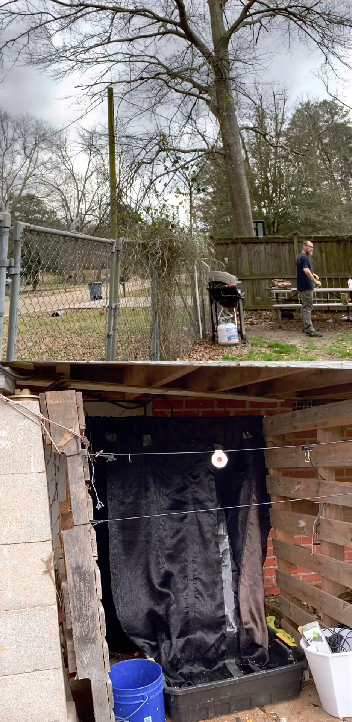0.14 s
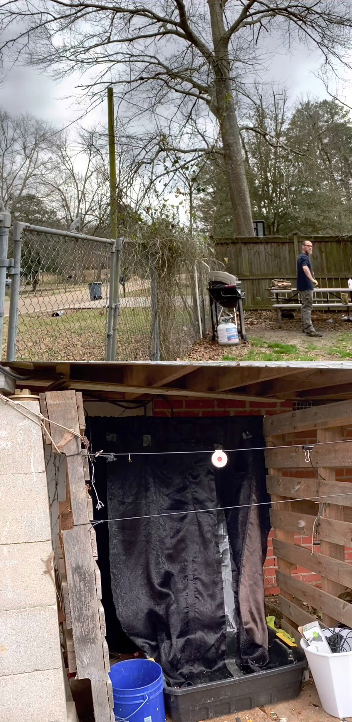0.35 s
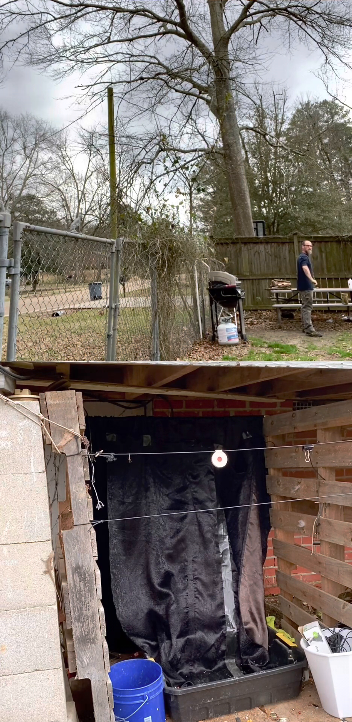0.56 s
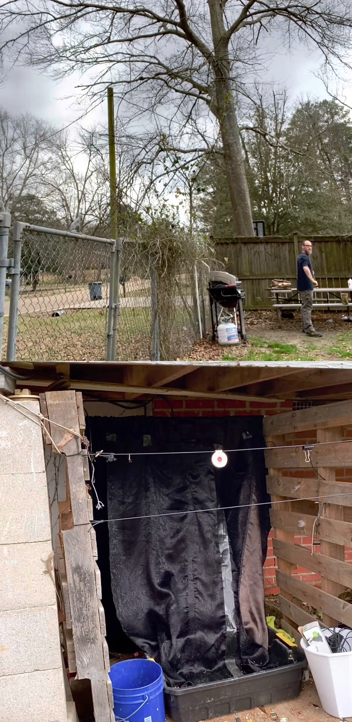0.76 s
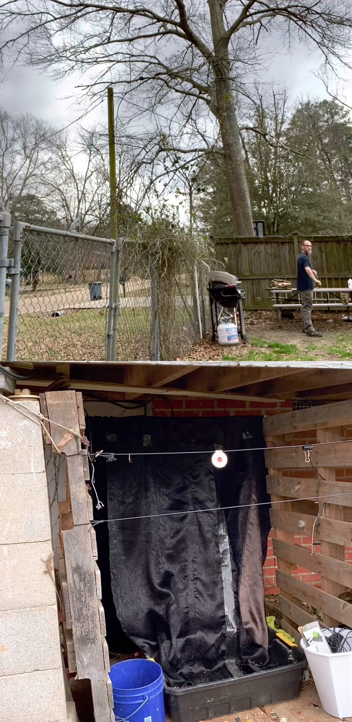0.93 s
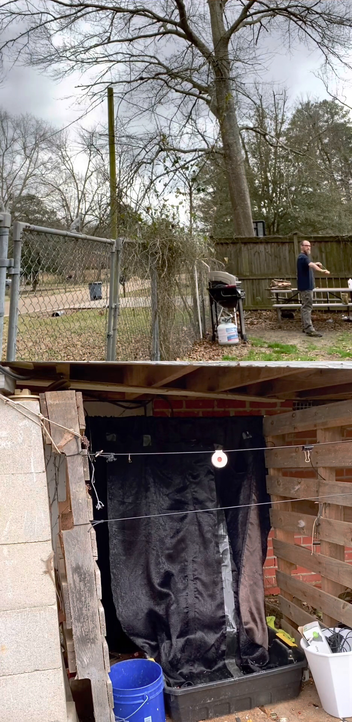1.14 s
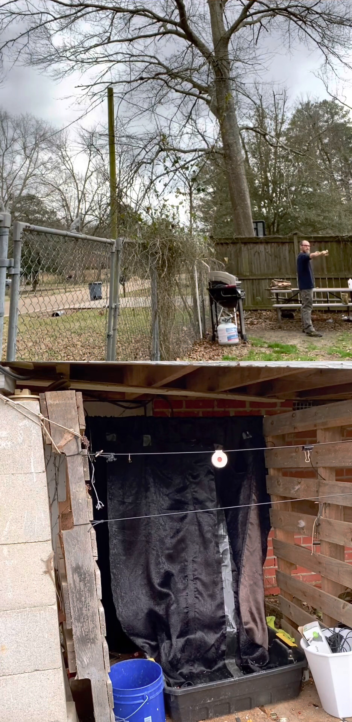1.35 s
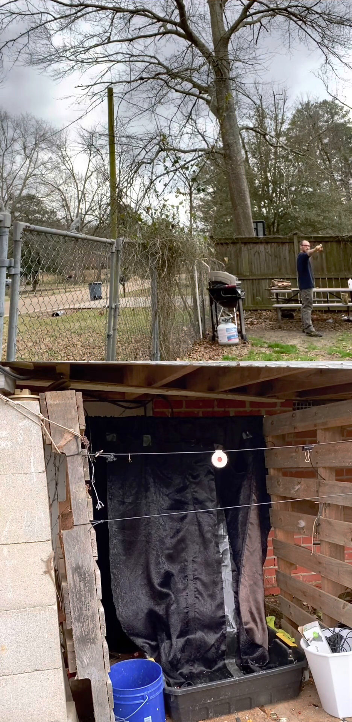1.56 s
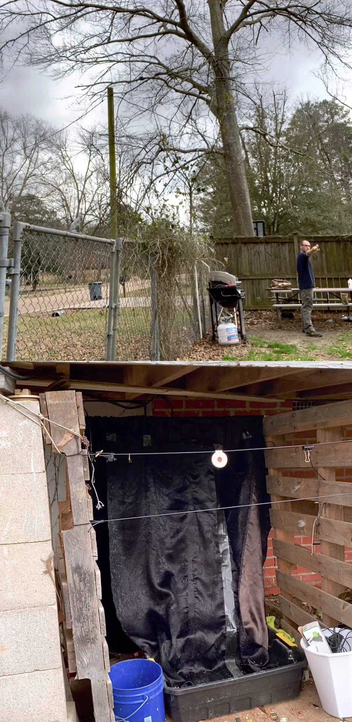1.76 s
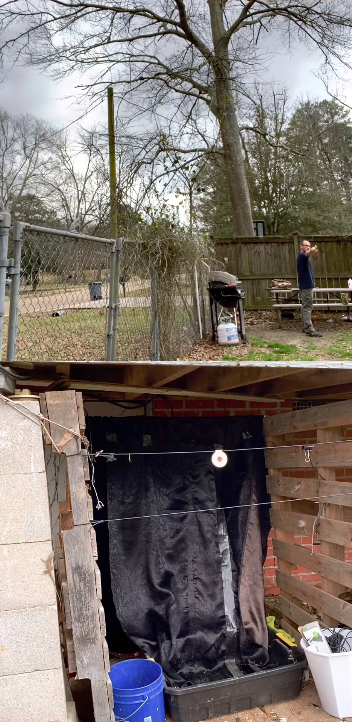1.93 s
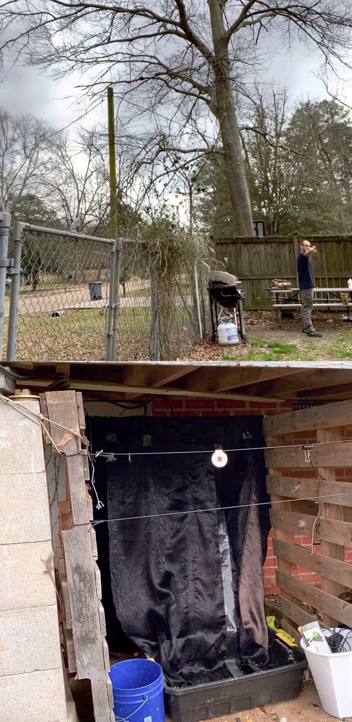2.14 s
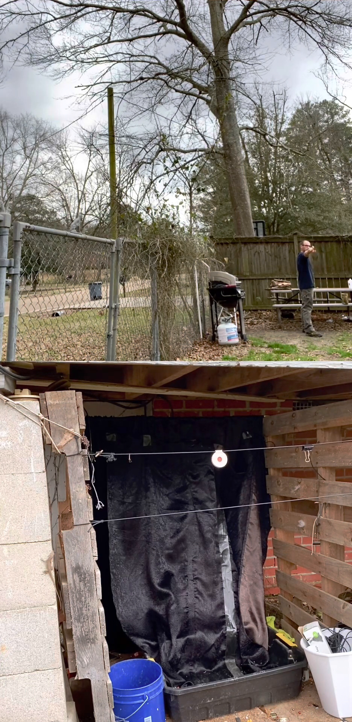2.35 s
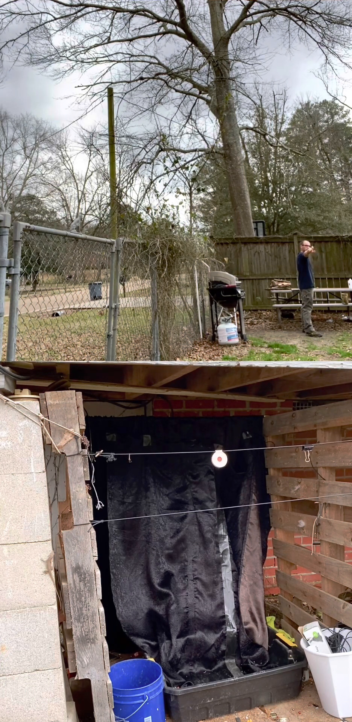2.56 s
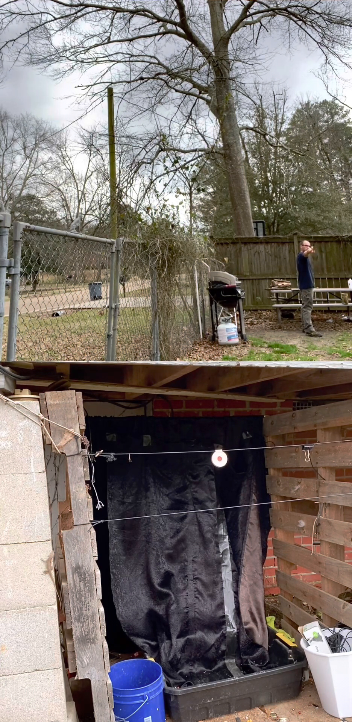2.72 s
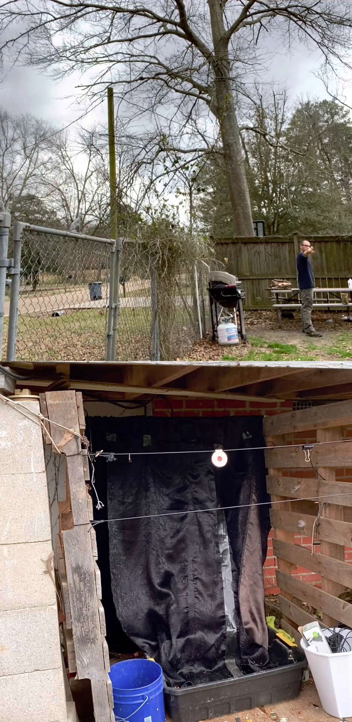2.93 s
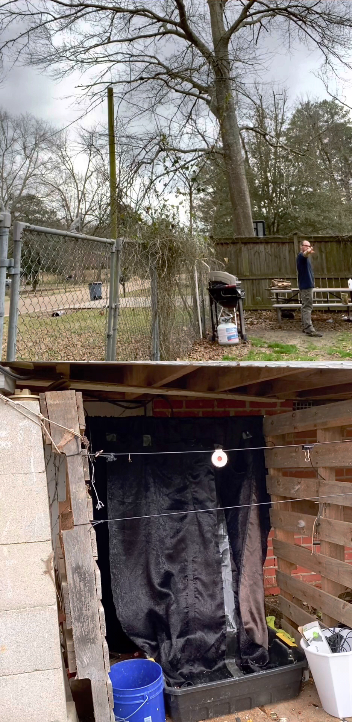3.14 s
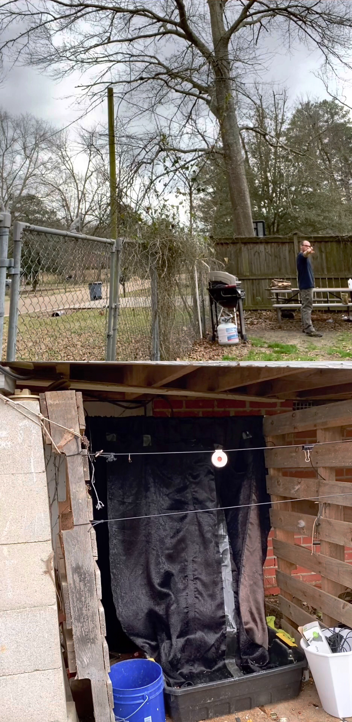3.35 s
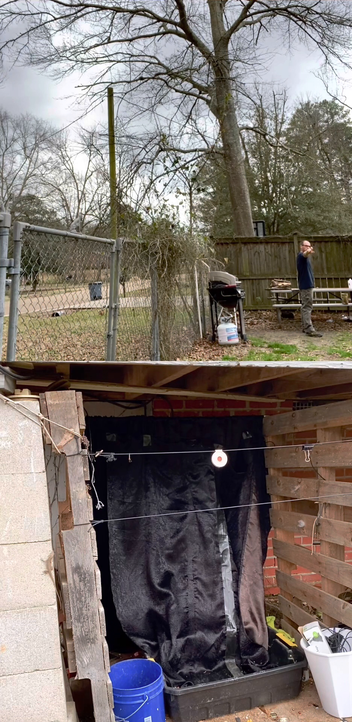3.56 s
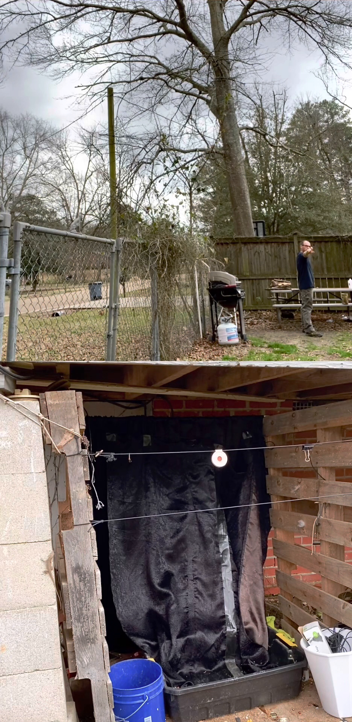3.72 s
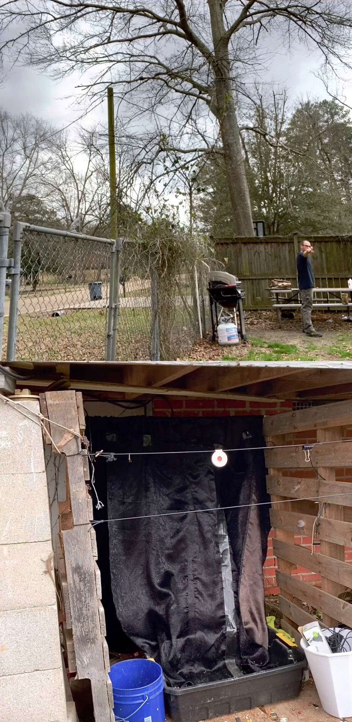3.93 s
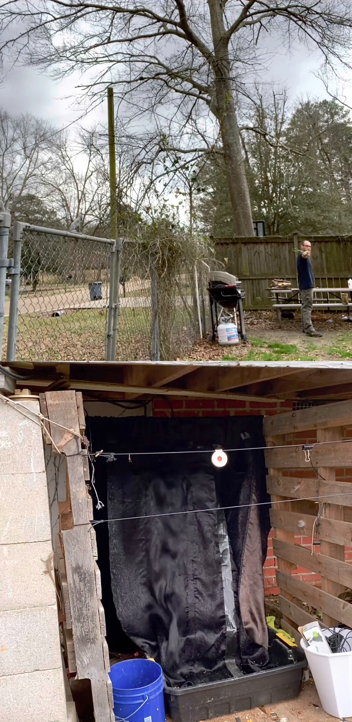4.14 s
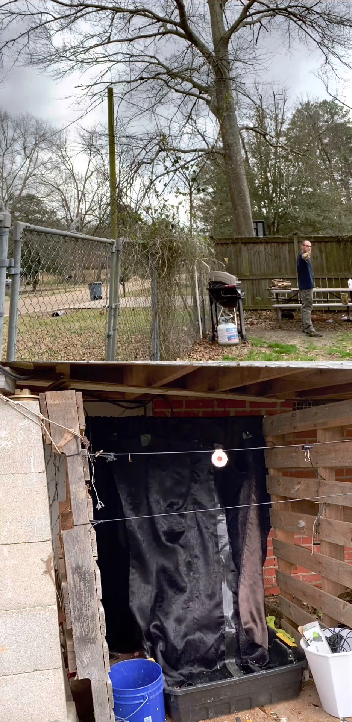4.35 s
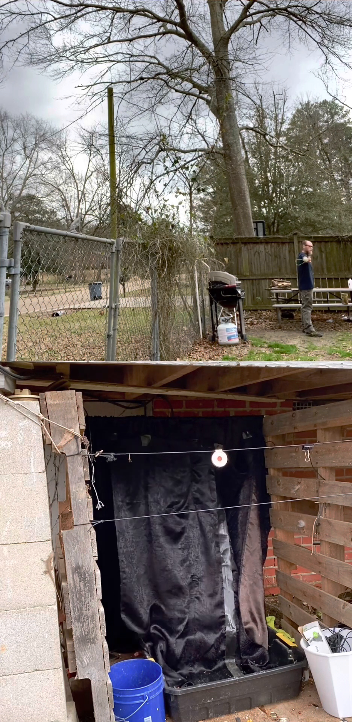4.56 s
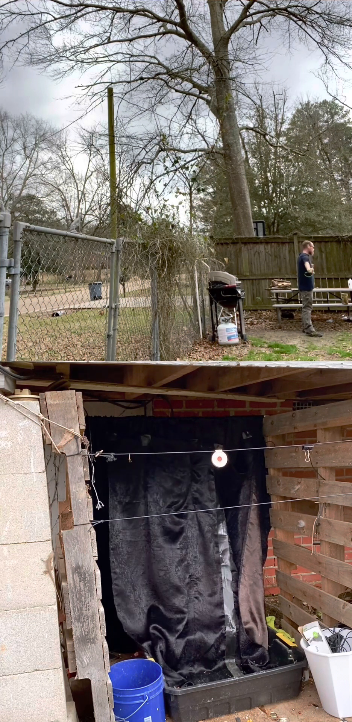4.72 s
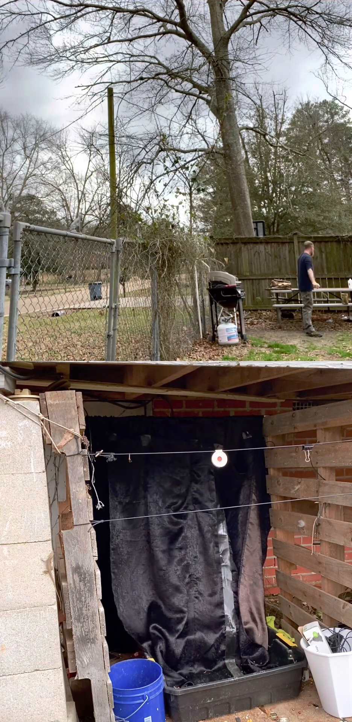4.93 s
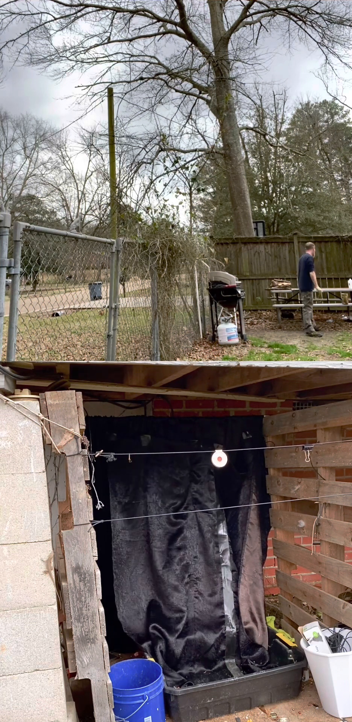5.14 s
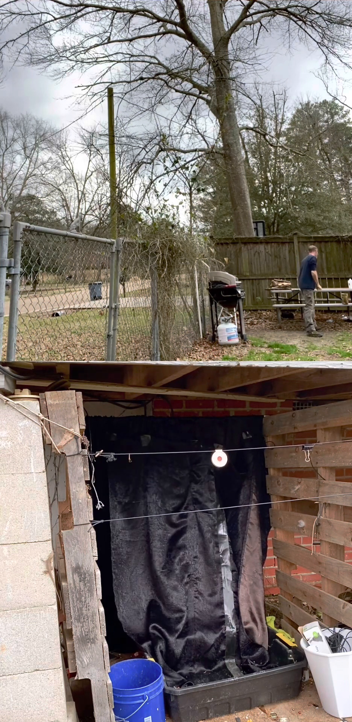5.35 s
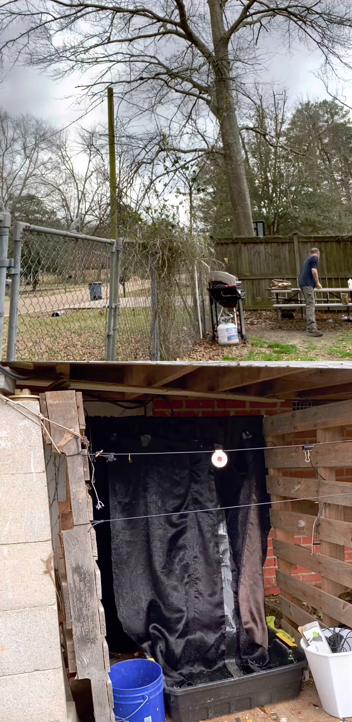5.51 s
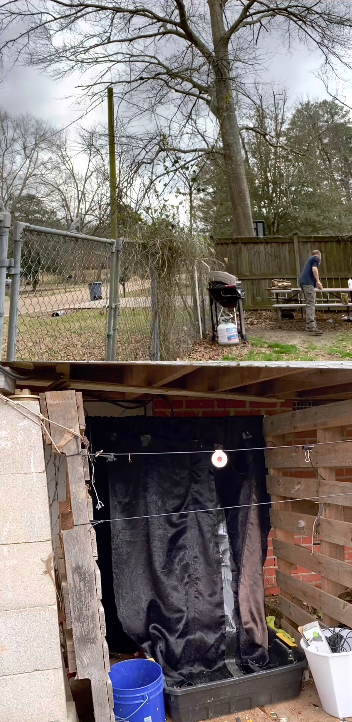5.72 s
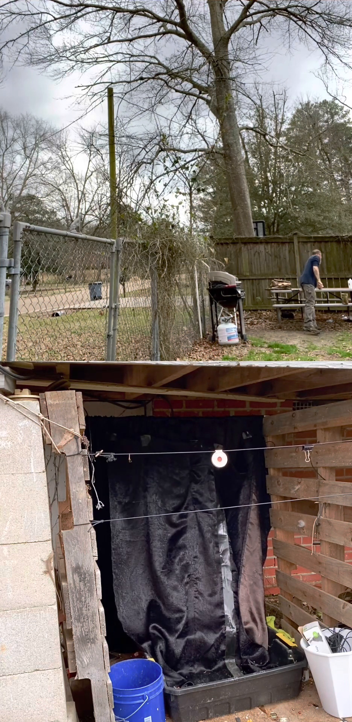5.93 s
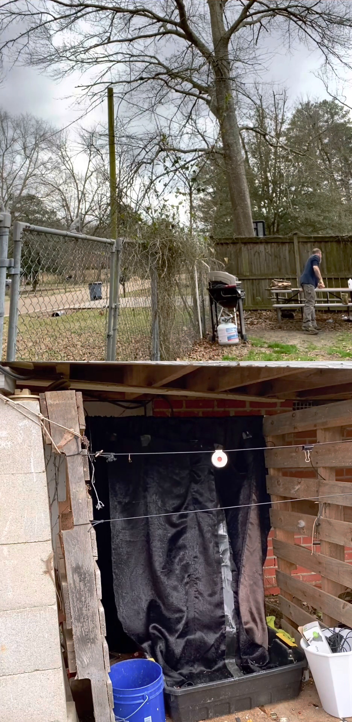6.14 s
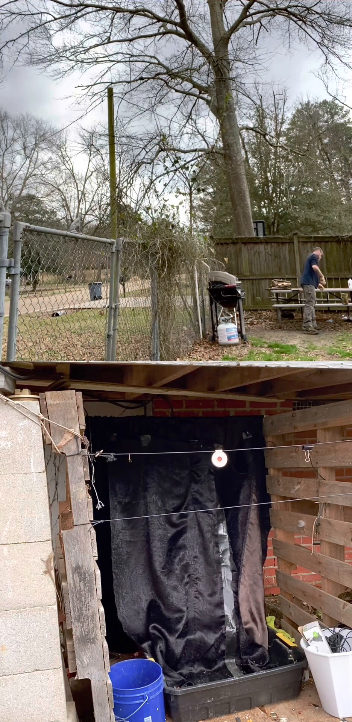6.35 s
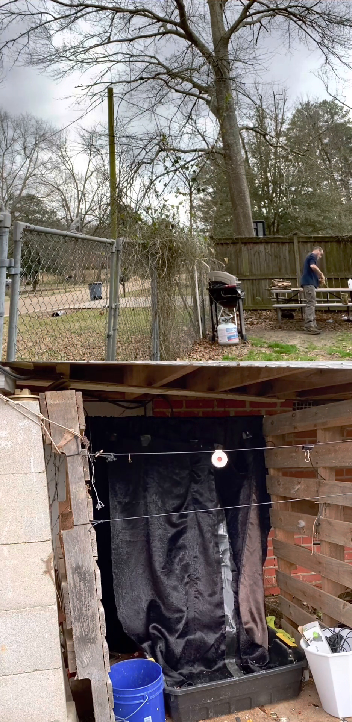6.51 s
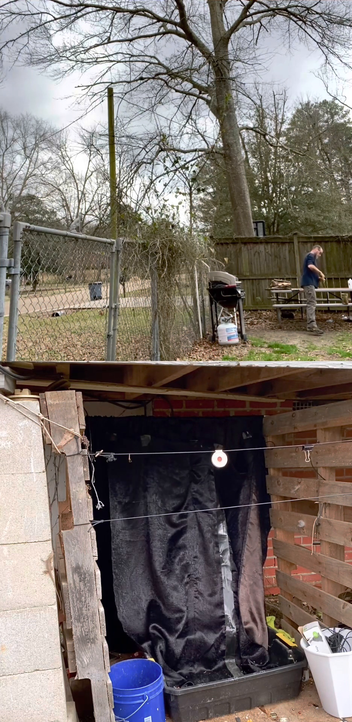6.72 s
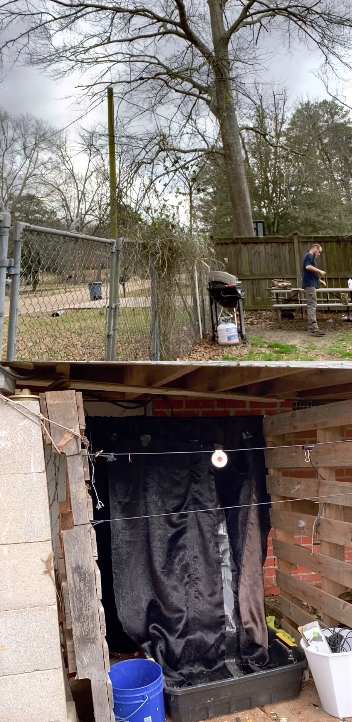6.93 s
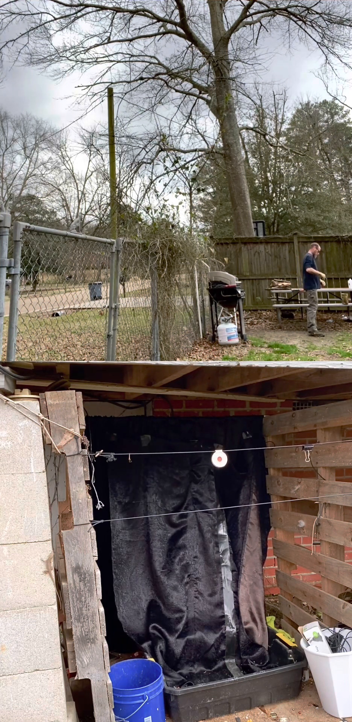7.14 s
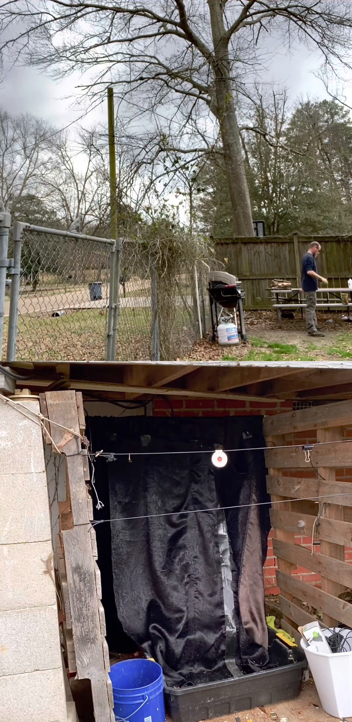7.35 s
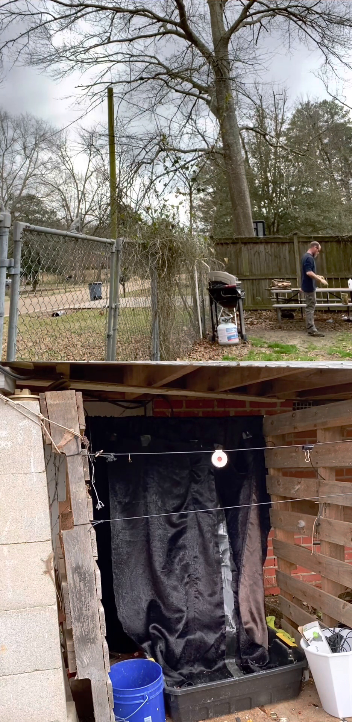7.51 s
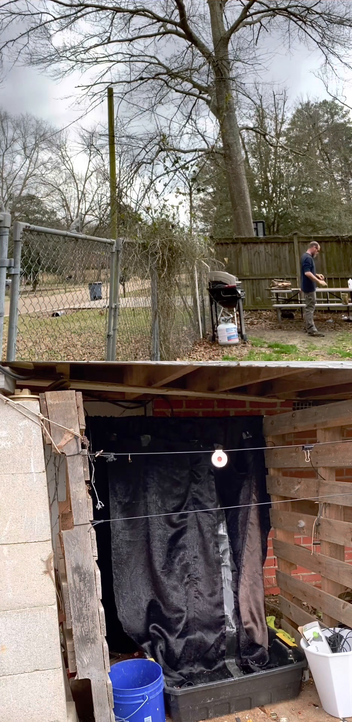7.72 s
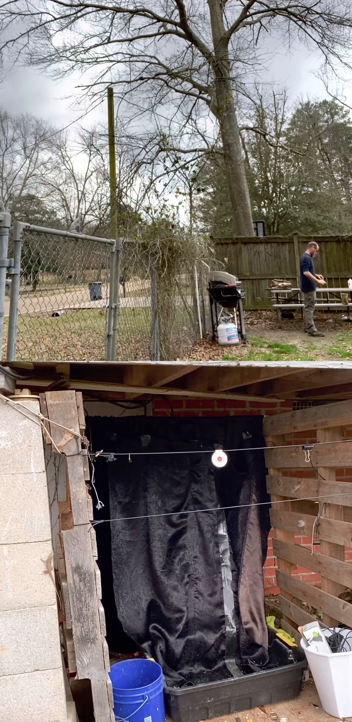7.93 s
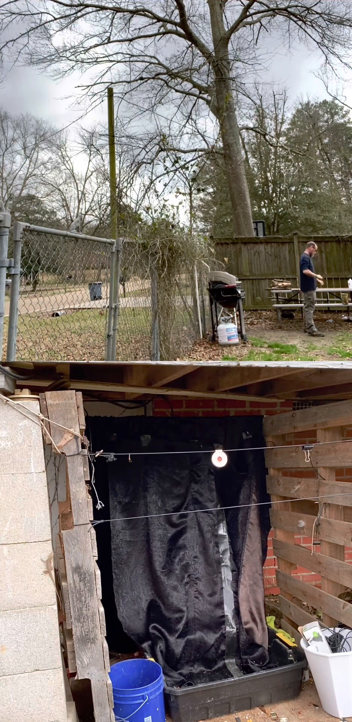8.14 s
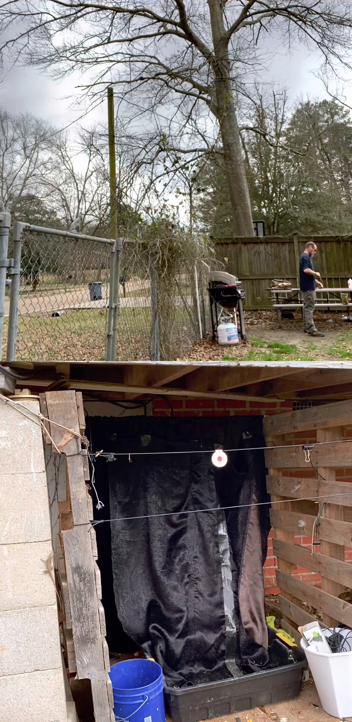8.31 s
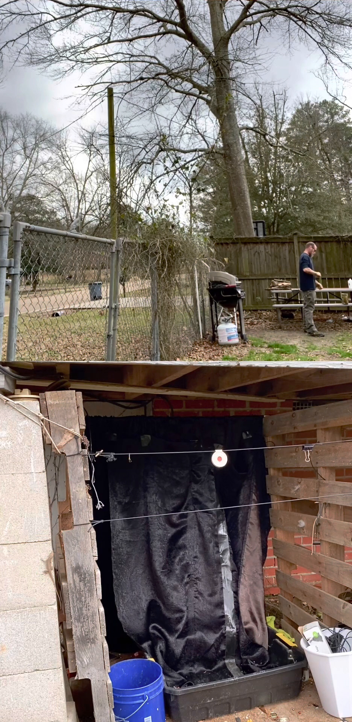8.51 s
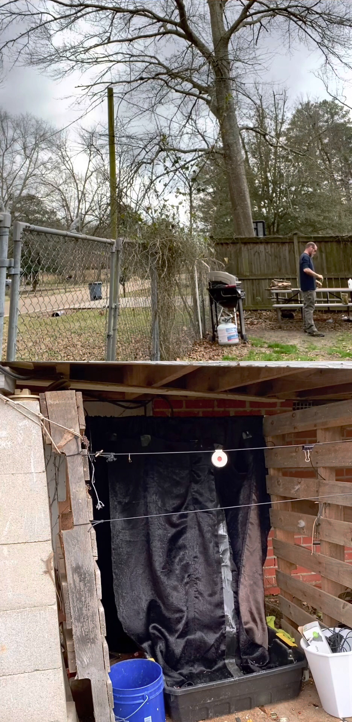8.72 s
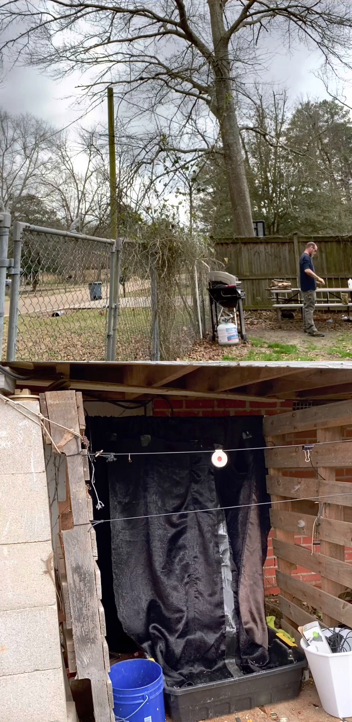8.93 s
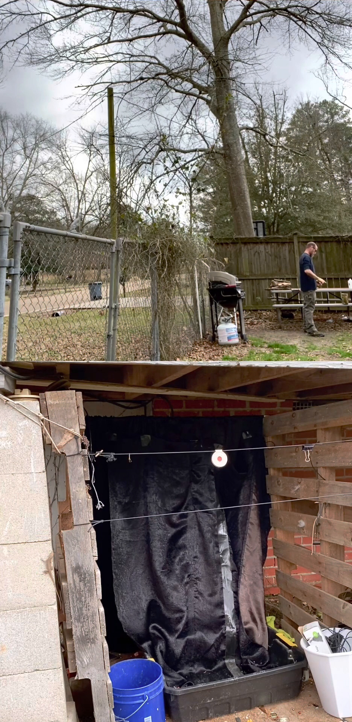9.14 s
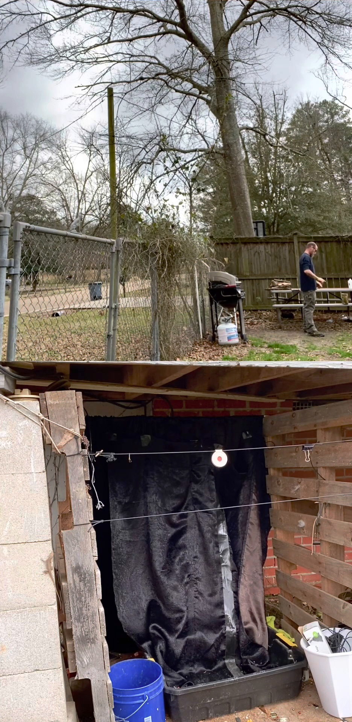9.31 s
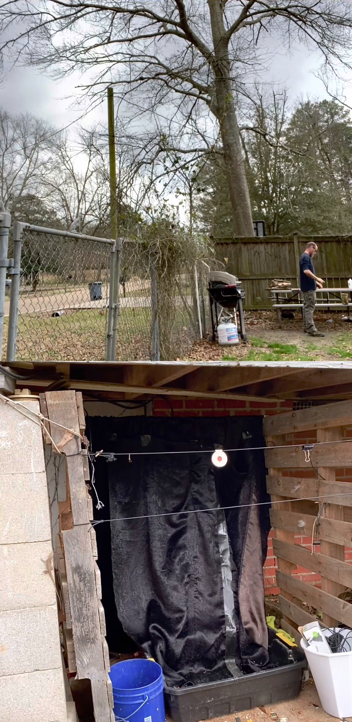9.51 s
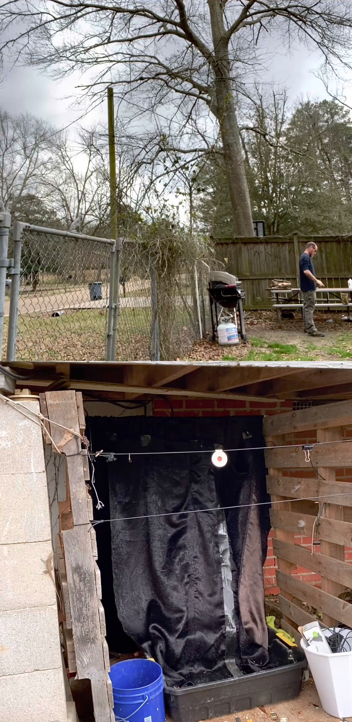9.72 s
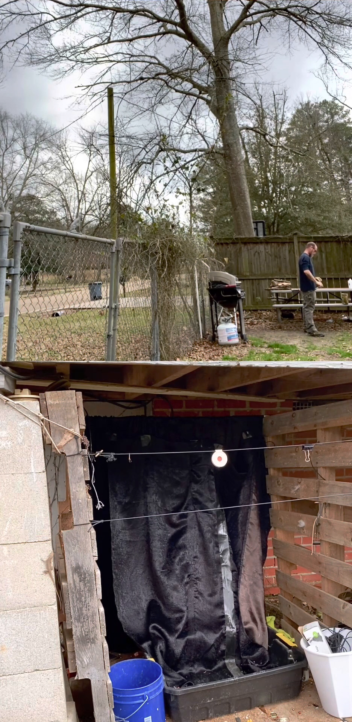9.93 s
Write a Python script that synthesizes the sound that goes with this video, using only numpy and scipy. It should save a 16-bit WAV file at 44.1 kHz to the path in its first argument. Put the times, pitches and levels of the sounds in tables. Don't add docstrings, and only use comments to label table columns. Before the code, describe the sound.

In a backyard with chirping songbirds and faint road rumble, slingshot bands snap and a steel ball cracks into a curtain, then drops in a tray.

```python
import sys
import numpy as np
from scipy import signal
from scipy.fft import rfft, irfft
from scipy.io import wavfile
from scipy.ndimage import uniform_filter1d, map_coordinates

SR = 44100
rng = np.random.default_rng(int(sys.argv[2]) if len(sys.argv) > 2 else 0)


def waveform_to_disk(signal):
    frames = np.transpose(np.atleast_2d(signal))
    scaled = np.clip(frames, -1, 1) * 32767
    samples = np.round(scaled).astype(np.int16)
    wavfile.write(sys.argv[1], SR, samples)


def attenuation_scalar(level_db):
    decades = np.asarray(level_db, float) / 20
    return 10 ** decades


N = 439677

# time_s, hiss_db, whistle_db (over the hiss)
FLIGHT = [(4.138, -72.5, -12), (4.157, -36.5, -6), (4.166, -27, -26), (4.182, -35, -20), (4.192, -30, -3),
          (4.207, -39, -2), (4.247, -36.5, -18), (4.285, -47.5, -6), (4.32, -79.5, -5)]
# start_s, peak_db, ring_hz, brightness_db
SLAPS = [(4.1695, -12.5, 1730, -3), (4.1778, -13.5, 1510, -9), (4.2107, -21, 1530, -24),
         (4.268, -31, 1600, -7)]
# freq_hz, density_db
HISS = [(250, -36.5), (500, -8.5), (1100, -1), (1600, -2.5), (2300, -4), (4400, -8.5), (6000, -14.5),
        (10700, -17), (16000, -35)]
# freq_hz, density_db
WHISTLE = [(4000, -57), (7000, -2), (10500, 1.5), (13000, -3.5), (15800, -14), (16500, -67)]

# start_s, peak_db, rattle_db (relative)
CURTAIN_BLOWS = [
    (4.2842, -3.5, -20),
]
# start_s, peak_db, rattle_db (relative)
BOX_RETURNS = [
    (4.2862, -13, -20),
    (4.2878, -10, -15),
]
# start_s, peak_db, rattle_db (relative)
SWING_BACK = [
    (4.455, -35, 3),
]
# start_s, peak_db, rattle_db (relative)
TRAY_BLOWS = [
    (4.5618, -3.5, -14),
    (4.785, -19.5, -13),
]
# start_s, peak_db, rattle_db (relative)
ROLLS = [(4.388, -42, -8), (4.41, -36, -10), (4.4222, -35, -12), (4.433, -37, -8), (4.5145, -46, -5),
         (4.6676, -41, -8), (4.679, -44, -8), (4.689, -44, -4)]
# freq_hz, density_db
CURTAIN = [(41, -33), (70, 0.5), (462, -3), (744, -5), (1510, 1.5), (1760, -12), (2120, -3), (2600, -10),
           (3570, -14.5), (4800, -19), (5250, -24), (10600, -36), (16000, -51.5)]
BOX_RETURN = [(80, -20), (200, -3), (450, 0), (900, -4), (2200, -3), (4000, -16), (9000, -32), (16000, -50)]
FLAP = [(59, -47), (100, -28), (267, -6), (700, -4), (1520, -10.5), (2520, -14), (3540, -24), (12000, -50),
        (15600, -85), (22000, -120)]
TRAY = [(88, -43), (150, -17), (398, -4), (624, -7), (821, -1), (1340, 1.5), (1690, -3), (2600, -4.5),
        (3400, -13), (4600, -20), (5570, -19), (6140, -26), (6640, -20), (7920, -25.5), (11000, -25.5),
        (16000, -52.5)]
RIM = [(120, -32), (200, -12), (600, -9), (1100, 0), (2000, -8), (4120, -15), (6050, -27), (9400, -26),
       (16000, -45)]
ROLL = [(200, -30), (600, -12), (1300, 0), (2500, -7), (4500, -17), (8000, -34), (16000, -60)]
# delay_s, level_db
FENCE = [(.0428, -9), (.065, 4.5), (.0738, -1.5), (.0797, -13), (.085, -14)]
FENCE_LOW = [(0.065, 1), (0.072, 4.5)]
# time_s, level_db
RUSTLE = [(4.29, -70), (4.31, -50), (4.39, -54), (4.44, -58), (4.49, -60), (4.55, -52), (4.57, -70)]
# low_hz, high_hz
RUSTLE_HZ = (1200, 3800)

# [(time_s, pitch_hz)]
SLURS = [(-51, [(1.035, 1740), (1.062, 3100), (1.07, 3050), (1.1, 2300), (1.12, 2180), (1.185, 2090)]),
         (-53, [(1.305, 2000), (1.36, 2720), (1.388, 2242)]), (-61.5, [(1.66, 2200), (1.7, 2520),
         (1.75, 2330), (1.8, 2060)]), (-59.5, [(1.84, 2233), (1.92, 2385), (1.95, 2720), (1.975, 2400),
         (2.0, 2600), (2.03, 2650)]), (-50, [(3.025, 1984), (3.055, 2530), (3.09, 2380), (3.16, 2283),
         (3.185, 1965)]), (-48.5, [(3.23, 2000), (3.28, 2570), (3.32, 2550), (3.365, 2800)]),
         (-51.5, [(6.008, 2960), (6.025, 2850), (6.05, 2790), (6.165, 2285), (6.2, 1990), (6.255, 2720),
         (6.292, 2120)]), (-52.5, [(8.825, 2150), (8.84, 2400), (8.9, 2365), (8.97, 2684), (9.03, 2450),
         (9.09, 1980)]), (-49, [(3.485, 2800), (3.495, 2780), (3.515, 2250), (3.533, 1980), (3.542, 2850),
         (3.55, 2720), (3.565, 2300), (3.6, 1950), (3.62, 1800)]), (-49, [(.796, 2050), (.804, 2950),
         (.815, 2200), (.83, 2080), (.84, 2150)]), (-53, [(6.578, 2450), (6.588, 2580), (6.6, 2000),
         (6.612, 2450), (6.64, 2500)]), (-63, [(6.655, 1800), (6.7, 2050)]), (-57, [(7.015, 1950),
         (7.03, 2500), (7.05, 2640), (7.07, 2400), (7.086, 2000)]), (-63, [(9.835, 2900), (9.885, 2600),
         (9.9, 2100), (9.922, 2800)])]
# start_s, turns, turn_s, lowest_hz, level_db
TRILLS = [(6.338, 7, .0203, 2060, -50.5)]
# start_s, length_s, lowest_hz, level_db
FLICKS = [(.67, 0.03, 1980, -58), (.686, 0.026, 2150, -54.5), (1.245, .021, 2250, -58),
          (1.29, .05, 2290, -62), (3.005, .013, 2620, -62), (9.555, 0.02, 2050, -59)]
FALLS = [(6.96, .03, 2140, -62)]
HOOKS = [(.85, .036, 2140, -55), (.898, 0.031, 2145, -56)]
ARCHES = [(9.165, 0.138, 2000, -52)]
DIPS = [(3.352, .066, 1990, -55), (6.7, .085, 2110, -59)]
PIPS = [(.755, 0.048, 1850, -61), (.86, 0.023, 3040, -55), (.905, 0.023, 3050, -61),
        (2.09, 0.03, 3000, -61), (2.12, 0.031, 2730, -59), (5.58, 0.044, 2440, -62), (5.86, .11, 2630, -71),
        (6.955, .025, 2110, -64), (9.71, 0.05, 2720, -63)]
GESTURES = [(FLICKS, (0.98, 1.23, 1.49)), (FALLS, (1.43, 1.18, 1)), (HOOKS, (1.5, 1.0, 1.06)),
            (ARCHES, (0.99, 1.23, 1)), (DIPS, (1.6, 1, 1.6)), (PIPS, (0.97, 1.01, 0.94))]
# start_s, peak_db, upper_db (relative), settle_s, puffs_hz
SCOLDS = [(0.3651, -68, 1, .06, 60), (1.4934, -63, -2, .06, 65), (2.5109, -63.5, -2, .02, 45),
          (3.2184, -61.5, -3, .14, 70), (4.8449, -65.5, -10, .065, 60), (5.8784, -62.5, -2, .065, 70),
          (6.7595, -65.5, -1, .1, 55), (8.104, -63.5, -3, .065, 70), (8.8543, -58, -8, .065, 55)]
# start_s, centre_hz, sweep_hz, level_db
TICKS = [(1.33, 5700, 4000, -68), (3.65, 5600, 400, -70), (5.69, 5600, -2700, -64),
         (6.32, 7500, -2600, -69), (6.805, 5650, 1407, -70), (7.18, 5400, 1800, -62.5),
         (7.98, 5370, -1800, -60.5), (8.83, 5630, -1300, -63), (9.62, 6150, 950, -67)]
# start_s, length_s, start_hz, end_hz, level_db
SEEPS = [(2.28, .054, 9700, 8000, -74), (2.33, 0.073, 8000, 8100, -69.5), (2.388, .069, 8100, 9400, -74),
         (7.38, .035, 11400, 10400, -78), (7.55, .15, 7850, 7550, -80.5)]
# start_s, length_s, start_hz, end_hz, level_db
PEEWS = [(3.19, .05, 3400, 3450, -65), (3.29, 0.18, 3330, 3120, -61), (3.48, .17, 3300, 3280, -69),
         (3.125, .065, 2950, 2700, -67), (3.21, 0.36, 6950, 6050, -78.5), (9.43, 0.11, 3400, 3370, -62),
         (9.57, .17, 3370, 3160, -63), (9.74, .22, 3250, 3230, -70), (1.73, .067, 3150, 2600, -72),
         (2.15, .25, 2500, 2750, -73), (5.85, .035, 4000, 3500, -69)]
# [(time_s, pitch_hz)]
HOARSE = [(-71, [(8.44, 2500), (8.475, 3050), (8.5, 3330), (8.6, 3690), (8.65, 3900), (8.74, 4170)]),
          (-78, [(8.45, 3400), (8.5, 3720), (8.55, 3950), (8.62, 4120)]), (-76, [(8.47, 2650), (8.51, 2920),
          (8.55, 3060), (8.62, 3350), (8.7, 3700)])]
# [(time_s, pitch_hz)]
DUET = [(-62, [(5.95, 3550), (5.985, 3200), (6.015, 2900)]), (-63, [(6.24, 2900), (6.255, 3080),
        (6.28, 2750)]), (-58, [(9.397, 3600), (9.412, 2600), (9.422, 2100)]), (-56, [(9.41, 2500),
        (9.435, 2330), (9.457, 1930)]), (-59, [(9.43, 2350), (9.5, 2560), (9.53, 2800), (9.54, 3250)]),
        (-59, [(9.5, 2050), (9.52, 2450), (9.545, 2900)]), (-62, [(9.575, 2750), (9.59, 2950),
        (9.61, 2400)]), (-64, [(9.635, 3300), (9.652, 3650)]), (-64, [(9.695, 4400), (9.715, 3200)]),
        (-62, [(9.765, 2650), (9.79, 2100), (9.805, 2150)]), (-62, [(9.935, 2330), (9.968, 2420)]),
        (-64, [(1.02, 2800), (1.045, 3700)])]
# [(time_s, pitch_hz)]
JUMBLE = [(-63, [(.535, 2600), (.555, 3750), (.57, 4150)]), (-63, [(.59, 3300), (.6, 3200), (.612, 3400),
          (.632, 2200)]), (-62, [(.648, 2300), (.665, 3100), (.68, 3500)]), (-61, [(.55, 1900),
          (.565, 2300), (.585, 2000), (.612, 1700)]), (-58, [(.708, 2950), (.722, 2300)]),
          (-74, [(.75, 3500), (.81, 4000)]), (-60, [(3.675, 2800), (3.695, 2100)]), (-62, [(3.7, 1900),
          (3.72, 2400)]), (-54, [(3.697, 2350), (3.715, 2450), (3.734, 2880)]), (-54.5, [(3.736, 2350),
          (3.748, 2800), (3.758, 2100)]), (-55.5, [(3.76, 2400), (3.775, 2720), (3.797, 2120)]),
          (-56, [(3.8, 2300), (3.81, 2680), (3.825, 2450), (3.835, 2100), (3.845, 2600), (3.852, 2300)]),
          (-64, [(3.79, 2900), (3.81, 3480), (3.835, 2800)]), (-64, [(7.0, 2200), (7.025, 2900),
          (7.065, 3170), (7.087, 3000)]), (-60, [(7.225, 1800), (7.245, 2130), (7.268, 1970),
          (7.282, 2380)]), (-60, [(7.228, 2400), (7.248, 2740), (7.27, 2400)]), (-62, [(7.278, 2780),
          (7.297, 2680)]), (-60, [(7.286, 2220), (7.306, 1990)]), (-57, [(7.307, 2480), (7.33, 2130),
          (7.345, 2400), (7.362, 2340)]), (-63, [(7.32, 2650), (7.342, 2820)])]
# start_s, length_s, note_count, level_db
CHATTER = [(.53, .36, 24, -67), (3.66, .24, 16, -65), (6.77, .08, 5, -64), (9.38, .56, 36, -68)]
# start_s, spacing_s, note_count, length_s, level_db
WHIPS = [(3.667, .1125, 5, .055, -75), (4.98, .185, 4, .045, -76), (7.365, .0562, 12, .02, -79)]
# start_hz, middle_hz, end_hz
WHIP_HZ = (3850, 4950, 5400)

# time_s, rumble_db
TRAFFIC = [(0, -46.5), (2.01, -46.5), (2.38, -57), (3.11, -44), (3.74, -50.5), (4.95, -57.5), (5.94, -52.5),
           (7.67, -54), (8.29, -46), (8.85, -49.5), (9.97, -46.5)]
# freq_hz, density_db
RUMBLE = [(12, -60), (25, -28), (40, -12), (56, 0), (80, -3), (110, -8), (140, -30), (240, -100)]
DRONE = [(47, -35), (80, 0.5), (210, -7.5), (314, -20), (371, -18.5), (400, -21.5), (520, -54), (880, -120)]
TYRES = [(160, -38.5), (280, -3.5), (372, -13), (401, -10), (432, -6.5), (551, -2.5), (849, -3),
         (915, -4.5), (1220, -7), (1530, -13), (3500, -29), (4550, -51), (7700, -120)]
AIR = [(1470, -25), (2500, -1), (2880, -4.5), (3720, -6.5), (4050, -8), (7020, -12.5), (7710, -13),
       (11400, -24.5), (14500, -34), (16000, -44)]
# time_s, pitch_hz, level_db
ENGINE = [(0.2, 66.3, -52.5), (3.47, 85.9, -49), (3.7, 80.1, -58.5)]
TRUCK = [(7.6, 47, -54), (8.12, 57.5, -43.5), (8.6, 61.65, -44.5), (9.97, 49.26, -48)]
HUM = [(0, 116, -41.5), (1.1, 114.9, -44), (2.3, 113.5, -47.5), (2.7, 114, -71)]
WHINE = [(7.4, 239, -64.5), (8.2, 237.6, -59.5), (8.45, 236, -83), (8.8, 233.2, -60), (9.97, 230, -61.5)]
# pitch_hz, level_db
FAN = [(222, -72), (642, -72), (765, -72.5), (855, -66.5), (970, -66.5), (1075, -73.5)]
# start_s, pitch_hz, t60_s, level_db
THUD = (9.3, 50, .3, -31)


def along(points, hz):
    f, v = np.transpose(points)
    return np.interp(np.log(hz + 1), np.log(f + 1), v)


def curves(rows):
    s, *cols = np.transpose(rows)
    return [np.interp(np.arange(N) / SR, s, c) for c in cols]


def wobble(rate):
    knots = rng.standard_normal(int(N * rate / SR) + 4)
    return map_coordinates(knots, [np.arange(N) * rate / SR])


def rush(spectrum, patchy_db):
    hz, _, z = signal.stft(rng.standard_normal(N + 2048), SR, nperseg=2048)
    field = uniform_filter1d(rng.standard_normal(z.shape), 12, axis=0)
    field = uniform_filter1d(field, 4, axis=1)
    gain_db = patchy_db * field / field.std() + along(spectrum, hz)[:, None]
    x = signal.istft(z * attenuation_scalar(gain_db), nperseg=2048)[1][:N]
    return x / x.std()


def causal(spectrum, size=4096):
    level_db = along(spectrum, np.fft.rfftfreq(size, 1 / SR))
    cepstrum = irfft(np.log(attenuation_scalar(np.maximum(level_db, -60))), size)
    cepstrum[1:size // 2] *= 2
    cepstrum[size // 2 + 1:] = 0
    h = irfft(np.exp(rfft(cepstrum)), size)[:size // 2]
    return h / np.abs(h).max()


def add(track, s, x):
    part = track[round(s * SR):][:len(x)]
    part += x[:len(part)]


def slingshot():
    hiss_db, whistle_db = curves(FLIGHT)
    out = attenuation_scalar(hiss_db + 1.5 * wobble(400)) * rush(HISS, patchy_db=.2)
    out += attenuation_scalar(hiss_db + whistle_db) * rush(WHISTLE, patchy_db=3.0)
    t = np.arange(SR // 50) / SR
    swell = t / .0008 * np.exp(1 - t / .0008)
    for s, db, hz, bright_db in SLAPS:
        ring = np.sin(2 * np.pi * hz * t)
        edge = np.sin(2 * np.pi * 1.9 * hz * t)
        edge += .5 * uniform_filter1d(rng.standard_normal(len(t)), 3)
        add(out, s - .001, attenuation_scalar(db) * swell * (ring + attenuation_scalar(bright_db) * edge))
    return out


def blows(rows, body, fence, front, dull_hz, yard_db, crack_t60, rattle_t60, echo_db=0, wall_hz=5000):
    out, t, h = np.zeros(N), np.arange(SR // 2) / SR, causal(body)
    soft = signal.butter(1, dull_hz, fs=SR)
    wall = signal.butter(2, [400, wall_hz], "band", fs=SR)
    for s, db, rattle_db in rows:
        crack, rattle, wash = rng.standard_normal((3, len(t)))
        after = rattle * attenuation_scalar(rattle_db - 60 * t / rattle_t60)
        after += wash * attenuation_scalar(yard_db - 60 * t / 0.58)
        push = 0.33 * crack * attenuation_scalar(-60 * t / crack_t60) + 0.35 * signal.lfilter(*soft, after)
        push[0] = front
        sound = attenuation_scalar(db) * signal.fftconvolve(push, h)[:len(t)]
        add(out, s, sound)
        for delay, face_db in fence:
            fading = attenuation_scalar(echo_db + face_db - 60 * t / 0.023)
            add(out, s + delay, fading * signal.lfilter(*wall, sound))
    return out


def rustle():
    level_db, = curves(RUSTLE)
    band = signal.butter(2, RUSTLE_HZ, "band", fs=SR)
    friction = signal.lfilter(*band, rng.standard_normal(N))
    return attenuation_scalar(level_db + 9 + 3 * wobble(150)) * friction * (level_db > -70)


def curtain():
    out = blows(CURTAIN_BLOWS, CURTAIN, FENCE, front=1.1, dull_hz=12000, yard_db=-30.0,
                crack_t60=0.008, rattle_t60=.13, echo_db=-14.0, wall_hz=6500)
    out += blows(BOX_RETURNS, BOX_RETURN, [], front=0.8, dull_hz=4000, yard_db=-40, crack_t60=0.02, rattle_t60=.06)
    out += blows(SWING_BACK, FLAP, [], front=0.6, dull_hz=900, yard_db=-14,
                 crack_t60=0.012, rattle_t60=0.2)
    return out + rustle()


def tray():
    out = blows(TRAY_BLOWS[:1], TRAY, FENCE_LOW, front=0.85, dull_hz=9000, yard_db=-31.5,
                crack_t60=0.016, rattle_t60=0.11, echo_db=-14, wall_hz=1900)
    out += blows(TRAY_BLOWS[1:], RIM, FENCE_LOW, front=1.2, dull_hz=9100, yard_db=-28.0,
                 crack_t60=0.028, rattle_t60=.12, echo_db=-27, wall_hz=2000)
    out += blows(ROLLS, ROLL, [], front=0.6, dull_hz=1800, yard_db=-37.5,
                 crack_t60=0.014, rattle_t60=0.11)
    return out


def bent(s, length, start_hz, mid_hz, end_hz, db):
    u = np.arange(round(length * SR)) / (length * SR)
    hz = start_hz * (1 - u) * (1 - 2 * u) + mid_hz * 4 * u * (1 - u) + end_hz * u * (2 * u - 1)
    return s, hz, db


def glides(rows):
    return [bent(s, length, a_hz, (a_hz + b_hz) / 2, b_hz, db) for s, length, a_hz, b_hz, db in rows]


def slurred(db, points, fainter=0.14, louder=0):
    s, hz = np.transpose(points)
    hz = np.interp(np.arange(s[0], s[-1], 1 / SR), s, hz)
    hz = uniform_filter1d(hz, round(0.012 * SR), mode="nearest")
    speed = np.abs(np.gradient(hz)) * SR / 1000
    return s[0], hz, db - fainter * speed + louder * (hz - 2400) / 1000


def notes(rows, octave_db, rough_db, blur_hz, fade_db=0):
    out, flutter = np.zeros(N), blur_hz * wobble(300)
    for s, hz, db in rows:
        start = round(s * SR)
        hz = hz[:N - start]
        u = np.arange(len(hz)) / len(hz)
        turn = 2 * np.pi * np.cumsum(hz + flutter[start:][:len(u)]) / SR
        swell = np.clip(np.minimum(u, 1 - u) * max(len(u) / SR / .01, 6), 0, 1)
        tone = np.sin(turn) + attenuation_scalar(octave_db) * np.sin(2 * turn)
        add(out, s, attenuation_scalar(db + 2.0 + fade_db * (.5 - u)) * swell * tone)
    return out * attenuation_scalar(rough_db * wobble(60))


def zigzag(s, turns, step, low_hz, db):
    points = []
    for k in range(round(turns) + 1):
        top_ratio = 1.46 * .975 ** (k // 2)
        points.append((s + k * step, low_hz * top_ratio ** (k % 2)))
    return db, points


def warble():
    phrases = SLURS + [zigzag(*row) for row in TRILLS]
    out = [slurred(*row, louder=3) for row in phrases]
    for rows, shape in GESTURES:
        out += [bent(s, length, *np.multiply(hz, shape), db) for s, length, hz, db in rows]
    return out


def scolds():
    out, t = np.zeros(N), np.arange(SR * 2 // 5) / SR
    ending = np.clip(t / .004, 0, 1) / (1 + (t / .25) ** 6)
    for s, db, upper_db, settle, rate in SCOLDS:
        jitter = uniform_filter1d(rng.standard_normal((2, len(t))), 200, axis=1)
        trill = 2 * np.pi * np.cumsum(rate + 350 * jitter[1, ::-1]) / SR
        lower_hz = 3330 + 450 * np.exp(-t / settle) + 130 * np.sin(trill) + 1500 * jitter[0]
        upper_hz = 4950 - 600 * np.exp(-t / .004) + 60 * np.sin(trill) + 1200 * jitter[1]
        fall = attenuation_scalar(upper_db - 6 - 60 * t / .9) + attenuation_scalar(upper_db + 4 - 60 * t / .06)
        voice = np.sin(2 * np.pi * np.cumsum(lower_hz) / SR)
        voice += fall * np.sin(2 * np.pi * np.cumsum(upper_hz) / SR)
        puffs = 1 + .65 * np.cos(trill)
        add(out, s, attenuation_scalar(db - 60 * t / 2.2) * puffs * ending * voice)
    return out


def chips():
    ticks = [(s, .013, hz - sweep / 2, hz + sweep / 2, db) for s, hz, sweep, db in TICKS]
    return glides(ticks + SEEPS)


def whips():
    out = []
    for s, gap, count, length, db in WHIPS:
        out += [bent(s + k * gap, length, *WHIP_HZ, db) for k in range(round(count))]
    return out


def chatter():
    out = []
    for s, length, count, db in CHATTER:
        for when, *bend in rng.random((count, 4)):
            centre, start, end = np.exp(.2 * (2 * np.array(bend) - 1))
            hz = 2550 * centre
            out.append(bent(s + when * length, .03, hz * start, hz, hz * end, db))
    return out


def echoes(x, t60, wet_db):
    t = np.arange(SR * 2 // 3) / SR
    tails = rng.standard_normal((6, len(t))) * attenuation_scalar(-60 * t / t60) * (1 - np.exp(-t / .03))
    wet = signal.oaconvolve(x[None], tails / np.linalg.norm(tails), axes=1)[:, :N]
    return x + attenuation_scalar(wet_db) * sum(path * wobble(120) for path in wet)


def birds():
    whistles = glides(PEEWS) + [slurred(*row) for row in HOARSE]
    crossing = [slurred(*row, fainter=.04) for row in JUMBLE + DUET]
    song = notes(warble(), octave_db=-42, rough_db=1.2, blur_hz=15, fade_db=3)
    song += scolds()
    song += notes(chips(), octave_db=-40, rough_db=0.5, blur_hz=595)
    song += notes(whistles, octave_db=-40, rough_db=2.2, blur_hz=50, fade_db=3)
    song += notes(crossing, octave_db=-42, rough_db=2, blur_hz=70)
    song += notes(whips() + chatter(), octave_db=-36, rough_db=2.0, blur_hz=90)
    return echoes(song, t60=.75, wet_db=-3.5)


def motor(rows, ratio, rough_db, over_db):
    hz, db = curves(rows)
    first_s, last_s = rows[0][0], rows[-1][0]
    near = np.interp(np.arange(N) / SR, [first_s - .3, first_s, last_s, last_s + 0.25], [0, 1, 1, 0])
    load = wobble(7)
    turn = 2 * np.pi * np.cumsum(hz * (1 + 0.00845 * load)) / SR
    tone = attenuation_scalar(db) * np.sin(turn) + attenuation_scalar(db + over_db) * np.sin(ratio * turn)
    return near * attenuation_scalar(2.5 + rough_db * load) * tone


def engines():
    out = motor(ENGINE, ratio=1.6, rough_db=4.0, over_db=1.5)
    out += motor(TRUCK, ratio=2.4, rough_db=4.0, over_db=-10)
    out += motor(HUM, ratio=2, rough_db=2.1, over_db=-24)
    out += motor(WHINE, ratio=1.33, rough_db=2.1, over_db=-9)
    return out


def road():
    rumble_db, = curves(TRAFFIC)
    thinning_db = 0.33 * np.arange(N) / SR
    drone_db, tyre_db = -52 - thinning_db / 2, -56.5 - thinning_db
    out = attenuation_scalar(rumble_db + 2.1 + 1.2 * wobble(5)) * rush(RUMBLE, patchy_db=1.2)
    out += attenuation_scalar(drone_db + 5 + 1.43 * wobble(5.4)) * rush(DRONE, patchy_db=0.5)
    out += attenuation_scalar(tyre_db + 1.5 + .4 * wobble(4)) * rush(TYRES, patchy_db=.9)
    return out


def fan():
    turn = 2 * np.pi * np.cumsum(1 + 0.00401 * wobble(12)) / SR
    fading_db = np.interp(np.arange(N) / SR, [0, 7, 10], [0, -1.5, -5])
    return sum(attenuation_scalar(db + fading_db + 5.15 * wobble(9)) * np.sin(hz * turn) for hz, db in FAN)


def door():
    out, t = np.zeros(N), np.arange(SR // 2) / SR
    s, hz, t60, db = THUD
    add(out, s, attenuation_scalar(db - 60 * t / t60) * (1 - np.exp(-t / 0.012)) * np.sin(2 * np.pi * hz * t))
    return out


def air():
    return attenuation_scalar(-74) * rush(AIR, patchy_db=2.0)


def scene():
    close = slingshot() + curtain() + tray()
    distant = road() + engines() + fan() + door() + air()
    return (close + birds() + distant)[None]


def band_limit(x):
    return signal.sosfilt(signal.butter(12, 16520, fs=SR, output="sos"), x)


def record(dry):
    dull = signal.lfilter(*signal.butter(8, 16000, fs=SR), dry)
    mix = dull / (1 + np.abs(dull / 0.87) ** 4) ** (1 / 4)
    return band_limit(mix)


dry = scene()
out = record(dry)
waveform_to_disk(out)
```